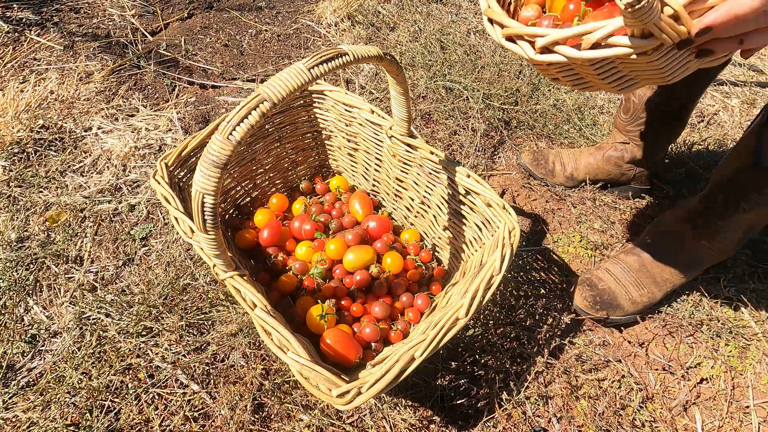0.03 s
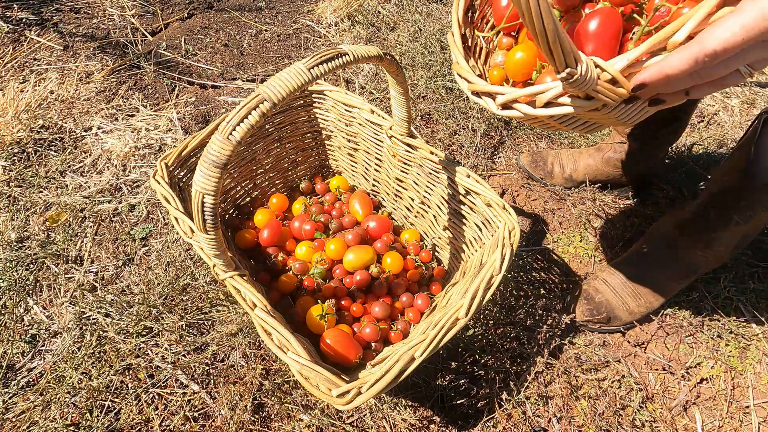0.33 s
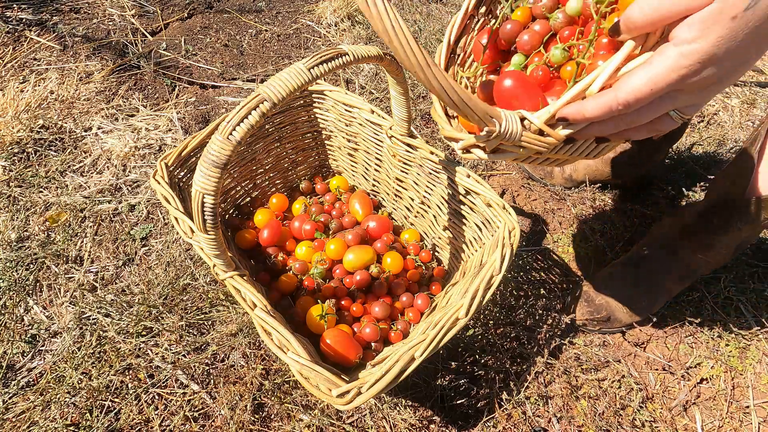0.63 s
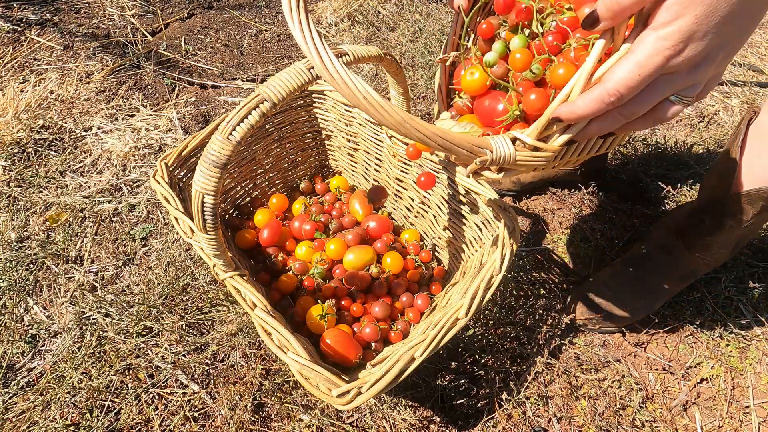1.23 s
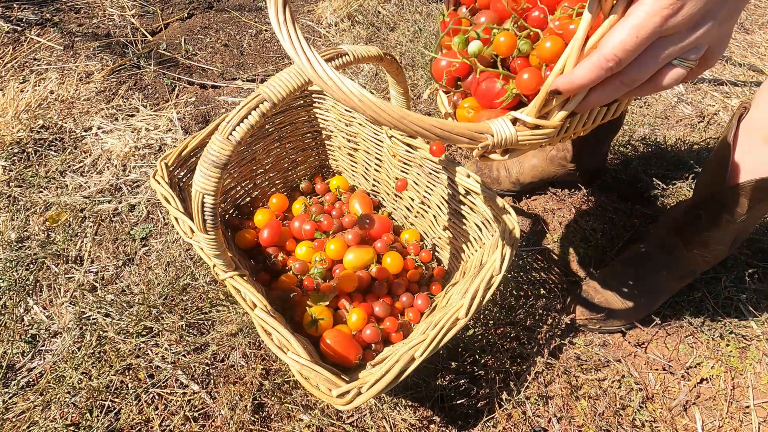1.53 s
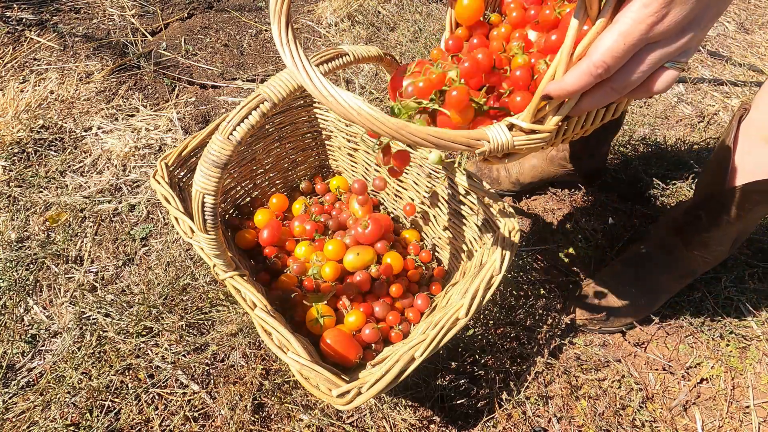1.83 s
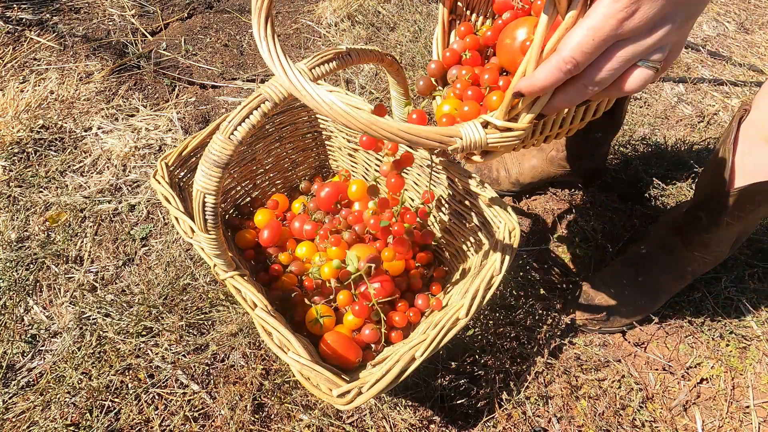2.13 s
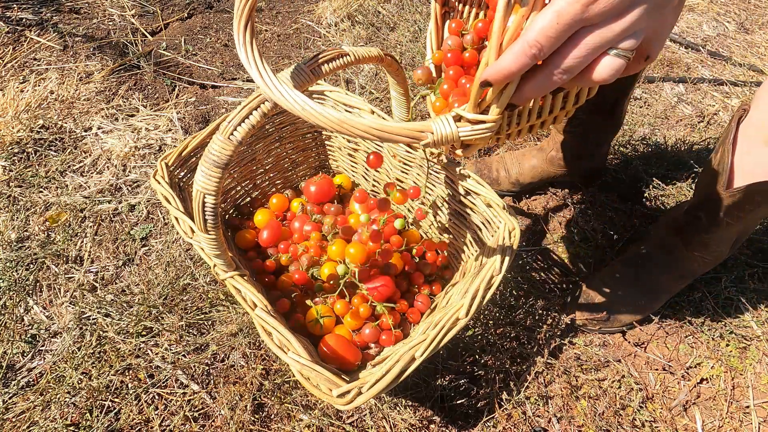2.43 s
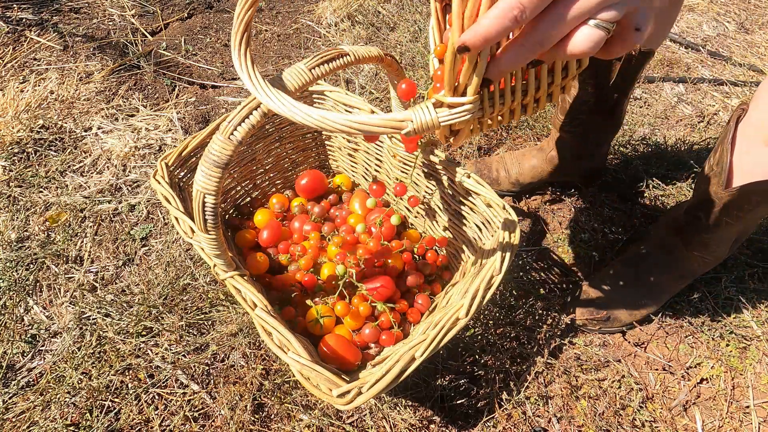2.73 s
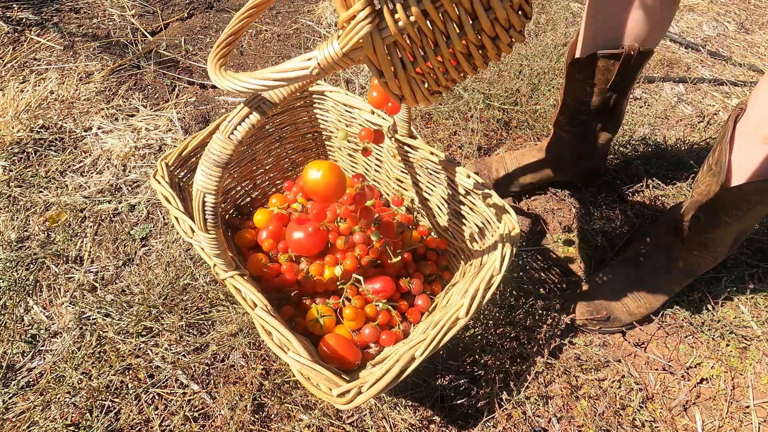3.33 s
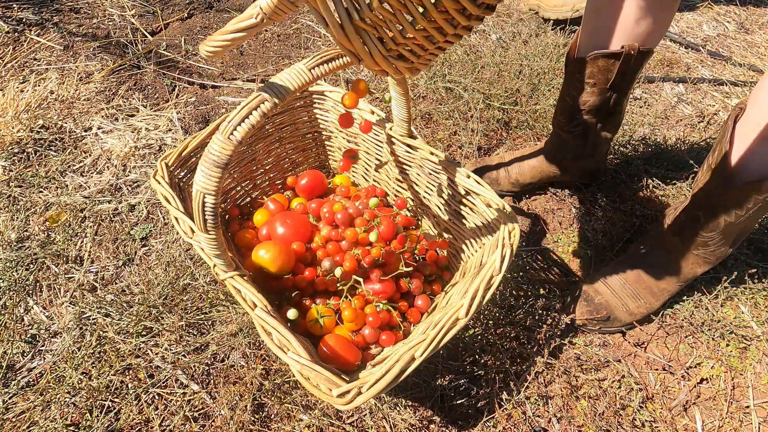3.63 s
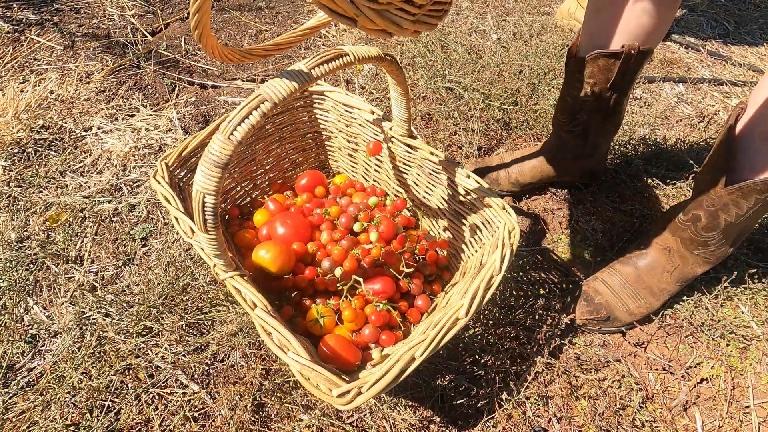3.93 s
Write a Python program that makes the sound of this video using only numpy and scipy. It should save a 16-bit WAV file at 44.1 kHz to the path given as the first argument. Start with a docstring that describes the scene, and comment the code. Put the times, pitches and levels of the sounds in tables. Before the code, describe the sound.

Small tomatoes tumble between baskets with soft patters, rustles and wicker creaks, after a moment of garden wind and distant chirps. A cane snaps midway, gusts bump the microphone, and a low metallic clang rings on late.

```python
"""Cherry tomatoes are tipped from one wicker basket into another in a garden.
From the start, wind rumbles and bumps the microphone, a far bird trills and the canes creak faintly.
After a second the pour begins: fruit rustles, patters and taps the weave, and stems and skins squeak.
Near two seconds another bird whistles, then a stout cane snaps and the whole basket rings.
Near the end a knock sets something metal, probably the microphone stand, ringing."""
import sys
import numpy as np
from scipy import signal
from scipy.fft import rfft, irfft, next_fast_len
from scipy.io import wavfile

SR = 44100
rng = np.random.default_rng(int(sys.argv[2]) if len(sys.argv) > 2 else 0)


def pcm_store(signal):
    """Save signal as 16-bit PCM."""
    levels = np.round(np.clip(np.atleast_2d(signal), -1, 1) * 32767)
    wavfile.write(sys.argv[1], SR, levels.astype(np.int16).T)


N = 176400   # 4 seconds

# how loud the wind is: t/s, level/dB
WIND_LOUDNESS = [(0, -47), (1.1, -45.5), (1.25, -41.5), (2, -40), (2.6, -35.5), (3.2, -38), (3.5, -41),
                 (4, -38)]
# tone of the wind: f/Hz, level/dB
WIND_TONE = [(22, 1), (40, 3.5), (70, 3), (110, -3), (160, -7.5), (240, -16.5), (400, -25)]
# tone of the far garden hush: f/Hz, level/dB
HUSH_TONE = [(250, -3), (600, -7), (1050, -2), (1500, -4), (2300, -16.5), (3500, -24.5), (5000, -29.5),
             (7500, -34.5), (9500, -47), (12800, -37.5), (15500, -44)]
# how loudly fruit and canes rub: t/s, level/dB
RUSTLE_LOUDNESS = [(0, -76), (.27, -70), (.47, -86.5), (.56, -76), (.88, -75.5), (1.02, -86), (1.09, -74),
                   (1.135, -75), (1.16, -55), (1.22, -60), (1.27, -64), (1.32, -72), (1.42, -65),
                   (1.47, -55), (1.53, -61), (1.6, -56), (1.83, -62), (1.93, -52.5), (2.07, -51.5),
                   (2.15, -47.5), (2.22, -54), (2.36, -53), (2.6, -55), (2.85, -58.5), (2.97, -51.5),
                   (3.06, -52), (3.12, -59.5), (3.25, -50.5), (3.5, -52), (3.7, -56.5), (4, -60)]
# tone of that rubbing: f/Hz, level/dB
RUSTLE_TONE = [(1200, -5), (2000, -1.5), (3300, 0), (5000, -4), (7600, -4.5), (9200, -12.5), (12200, -7.5),
               (13600, -19), (15500, -31)]
# bird trills: t/s, number of chirps, level/dB
BIRD_TRILLS = [(.003, 6, -57.5), (.517, 4, -62.5), (.679, 5, -59), (1.7, 4, -61), (1.868, 4, -54),
               (2.302, 5, -56), (2.72, 8, -59)]
# wind hits the microphone: t/s, level/dB, length/s, top f/Hz, left minus right/dB
WIND_BUMPS = [(0.064, -35, .065, 195, -3), (0.39, -35.5, .05, 220, 3), (0.482, -41.5, .07, 94, 0),
              (.6, -38, .04, 127, 3), (0.928, -42, .05, 120, -6), (1.145, -37.5, .06, 135, -2),
              (1.555, -42, .04, 148, 12), (1.66, -39, .035, 123, 8), (2.409, -33.5, .025, 172, -10),
              (2.477, -31, .07, 195, -7.5), (2.707, -29.5, .04, 119, -7), (2.785, -27, .085, 175, -4.5),
              (2.881, -31, .06, 207, -8), (3.069, -30.5, .042, 185, -5.5)]
# canes creak: t/s, level/dB, fade time/s, centre f/Hz
CANE_CREAKS = [(.129, -61.5, 0.0051, 4970), (.248, -65, .008, 5000), (.274, -66, .006, 6460),
               (.521, -63, .004, 7500), (.6345, -49, .005, 6900), (.898, -68, .005, 6000),
               (1.147, -49, 0.022, 4000), (1.1672, -47, 0.0099, 3340), (1.251, -60, 0.0041, 7500),
               (1.2785, -47.5, 0.0042, 3720), (1.4486, -44, 0.022, 8000), (1.464, -41.5, 0.013, 11000),
               (1.518, -47, 0.0028, 4800), (1.5529, -46, 0.016, 7760), (1.598, -49.5, .025, 11500),
               (1.6775, -37.5, 0.008, 10600), (1.7482, -31.5, 0.0032, 4800), (1.9245, -45.5, .018, 3770),
               (1.965, -49, 0.011, 3780), (1.9894, -36.5, 0.0037, 3520), (2.015, -46, .003, 3800),
               (2.0572, -48, .008, 4800), (2.1034, -23.8, 0.012, 3400), (2.117, -39.5, 0.021, 4900),
               (2.149, -41, .002, 3600), (2.1814, -36.5, 0.011, 5560), (2.2412, -38.5, 0.004, 5370),
               (2.253, -45, .008, 7000), (2.2722, -32.5, 0.005, 4300), (2.286, -40, .005, 5500),
               (2.3146, -44, .004, 3800), (2.3503, -36.5, 0.004, 4400), (2.356, -43, .012, 7500),
               (2.4284, -45, 0.0047, 7000), (2.5045, -44, 0.008, 6500), (2.521, -46, .003, 7000),
               (2.584, -48, .004, 5500), (2.6362, -37.5, 0.003, 3970), (2.7487, -48, .003, 5200),
               (2.942, -47, 0.004, 4500), (2.952, -45, .003, 8000), (2.981, -46, .003, 5500),
               (3.033, -49.5, 0.015, 5400), (3.0535, -43, 0.016, 5900), (3.16, -45, 0.013, 7000),
               (3.187, -46.5, 0.0074, 8000), (3.253, -46, .004, 6600), (3.2889, -43.5, 0.02, 7200),
               (3.3114, -35, 0.016, 5700), (3.398, -44.5, 0.014, 5500), (3.589, -44.5, 0.0077, 7950),
               (3.6132, -38.5, 0.0046, 6500), (3.8072, -49.5, 0.0079, 4800), (3.8731, -46, 0.0045, 5500),
               (3.8955, -46, 0.0038, 7500)]
# how loudly fruit lands on fruit: t/s, level/dB
PATTER_LOUDNESS = [(0, -97), (1.1, -71), (1.25, -54.5), (1.8, -56.5), (2.1, -50.5), (2.9, -52.5),
                   (3.2, -50), (3.6, -53), (4, -50)]
# tone of those landings: f/Hz, level/dB
PATTER_TONE = [(200, -10), (450, -2.5), (800, -3), (1600, -2.5), (3000, -13), (6000, -22)]
# single tomatoes hit the weave: t/s, level/dB, fade time/s, centre f/Hz
TOMATO_TAPS = [(1.1721, -39, 0.02, 407), (1.1986, -31.5, 0.0052, 1250), (2.857, -47, 0.025, 700),
               (2.891, -43, 0.008, 280), (2.917, -41, 0.011, 330), (3.083, -46, 0.011, 280),
               (3.4763, -40, 0.0042, 1400), (3.615, -42, 0.013, 1130), (3.9207, -45, 0.0056, 2200),
               (3.934, -46, 0.0068, 2000)]
# stems and skins squeak: t/s, level/dB, length/s, start f/Hz, end f/Hz
SKIN_SQUEAKS = [(1.312, -58, .03, 4500, 3850), (1.322, -64, .026, 6400, 6200),
                (1.83, -57, .026, 5350, 5100), (1.917, -55, .024, 4500, 3900)]
# notes of the basket frame: f/Hz, level/dB, time to fade by 60 dB/s
FRAME_NOTES = [(1200, -34, .06), (1560, -36, .05), (2191, -32, .065), (3397, -32, .05), (5039, -38, .06),
               (7494, -36, .045)]
# tone of the metal's many high notes, blurred together: f/Hz, level/dB
CLANG_TONE = [(90, -11), (150, 0), (400, -3.5), (800, -6.5), (1500, -10), (2500, -20.5), (7000, -23),
              (15000, -37)]
# low notes of the metal: f/Hz, level/dB, time to fade by 60 dB/s, left minus right/dB
METAL_NOTES = [(62.7, -43, 3.3, -3), (139, -32.5, 1.7, 2.5), (145, -20.5, 0.38, 1), (192, -39, 5.5, 1),
               (243, -36.5, 1.6, 4), (275, -40, 0.65, -13), (406, -34.5, 1.55, -2), (435, -42.5, 1.4, -5),
               (544, -43, 0.8, -7), (616, -35.5, 0.42, 9), (663, -46, 1.1, -4), (739, -41, 1.2, 3),
               (791, -43, 1.1, -1), (840, -38.5, .65, -8), (965, -41, .5, 0)]
# stereo width, as gain on what differs between left and right: t/s, level/dB
STEREO_WIDTH = [(0, -54), (1.12, -39), (1.16, -4.5), (2.2, -5), (2.6, 0.5), (4, -1.5)]


def from_db(db):
    """Turn decibels into a number to multiply by."""
    return 10 ** (np.asarray(db) / 20)


def rms_one(x):
    """Scale a sound so its average strength (rms) is 1."""
    return x / np.sqrt(np.mean(x ** 2) + 1e-20)


def level(rows):
    """A volume curve through (t/s, level/dB) points."""
    return from_db(np.interp(np.arange(N) / SR, *np.transpose(rows)))


def pan(db):
    """Left and right gains; positive db leans left."""
    return from_db(np.array([[db], [-db]]) / 2)


def add(out, at_s, sound):
    """Mix a sound in at a given time."""
    start = max(int(at_s * SR), 0)
    part = sound[..., :max(N - start, 0)]
    out[:, start:start + part.shape[-1]] += part


def band(x, low_hz, high_hz, order=2):
    """Keep what lies between two frequencies; a higher order cuts more sharply."""
    high_hz = min(high_hz, .45 * SR)
    sos = signal.butter(order, [min(low_hz, high_hz / 2), high_hz], "band", fs=SR, output="sos")
    return signal.sosfilt(sos, x + 1e-18)


def colour(x, tone):
    """Shape a sound with a tone table, falling steeply past its ends; the result has rms 1."""
    hz, db = np.transpose(tone)
    size = next_fast_len(N + SR // 2)
    octave = np.log2(np.maximum(np.fft.rfftfreq(2 * size, 1 / SR), 1))
    outside = np.abs(octave - np.clip(octave, np.log2(hz[0]), np.log2(hz[-1])))
    gain_db = np.interp(octave, np.log2(hz), db) - np.minimum(24 * outside, 70)
    # these two steps make a filter that rings only after a click, never before it
    cepstrum = irfft(np.log(from_db(gain_db)))
    response = np.exp(rfft(2 * cepstrum[:size], 2 * size))
    return rms_one(irfft(rfft(x, 2 * size) * response)[..., :N])


def noise(size, likeness):
    """Stereo hiss; likeness runs from 0 (unrelated ears) to 1 (the same in both)."""
    mid, side = rng.standard_normal((2, size))
    return np.sqrt((1 + likeness) / 2) * mid + np.sqrt((1 - likeness) / 2) * np.array([side, -side])


def wander(per_s):
    """A slow random curve with per_s new values each second."""
    points = rng.standard_normal(400)
    return np.interp(np.arange(N) / SR * per_s, np.arange(len(points)), points)


def clicks(per_s, spread_db, size):
    """Clicks at random times, of uneven strength."""
    strength = from_db(spread_db * np.minimum(rng.exponential(1, size), 4))
    return (rng.random(size) < per_s / SR) * strength * rng.choice([-1, 1], size)


def grains(per_s, spread_db, ring_s, likeness, spots=12):
    """Tiny hits shared among several spots, each with a short ring of its own."""
    out, t = np.zeros((2, N)), np.arange(SR // 40) / SR
    hits, spot = clicks(per_s, spread_db, N), rng.integers(0, spots, N)
    for k in range(spots):
        ring = noise(len(t), likeness) * np.exp(-t / ring_s)
        out += signal.oaconvolve([hits * (spot == k)], ring, axes=1)[:, :N]
    return out


def note(length_s, db, start_hz, end_hz, unsteady=.0087):
    """A sliding tone whose pitch wobbles by the fraction `unsteady`."""
    size = int(length_s * SR)
    wobble = rms_one(band(rng.standard_normal(SR // 2), 40, 300))[-size:]
    hz = np.linspace(start_hz, end_hz, size) * (1 + unsteady * wobble)
    return from_db(db) * np.hanning(size) * np.sin(2 * np.pi * np.cumsum(hz) / SR)


def wind():
    """Moving air rumbles low on the microphone."""
    return level(WIND_LOUDNESS) * colour(noise(N, likeness=.934), WIND_TONE)


def hush():
    """The steady, soft noise of the far garden."""
    return from_db(-57) * colour(noise(N, likeness=1), HUSH_TONE)


def rustle(surges_per_s=38, surge_db=4.4):
    """Fruit and canes rub in many tiny touches as the load slides in little surges."""
    rubbing = grains(per_s=2400, spread_db=3.5, ring_s=.0015, likeness=.83)
    surges = from_db(surge_db * wander(surges_per_s))
    return level(RUSTLE_LOUDNESS) * colour(rubbing * surges, RUSTLE_TONE)


def ticks(canes=22, low_hz=1900, high_hz=8000, fade_cycles=15, db_per_octave=-.5, below_rustle_db=5):
    """Single stems and canes tick, each ringing briefly at its own pitch and place."""
    out, t = np.zeros((2, N)), np.arange(SR // 40) / SR
    hits, cane = clicks(per_s=220, spread_db=2.6, size=N), rng.integers(0, canes, N)
    for k, hz in enumerate(np.geomspace(low_hz, high_hz, canes)):
        ring = rms_one(np.exp(-t * hz / fade_cycles) * np.sin(2 * np.pi * hz * t))
        burst = rng.standard_normal(len(t)) * np.exp(-t / .0008)
        crack = rms_one(band(burst, hz / 1.6, hz * 1.6, order=1))
        gain = from_db(db_per_octave * np.log2(hz / low_hz)) * pan(rng.normal(0, 4))
        out += gain * signal.oaconvolve(hits * (cane == k), ring + .5 * crack)[:N]
    return level(RUSTLE_LOUDNESS) * from_db(-below_rustle_db) * rms_one(band(out, low_hz / 2, high_hz))


def bird_trills(every_s=.041, length_s=.032, start_hz=3680, end_hz=3270, echo_s=.013, echo_db=-11):
    """A far bird sings runs of falling chirps, no two alike, each with a faint echo."""
    out = np.zeros((2, N))
    for start_s, count, db in BIRD_TRILLS:
        for k, (late, loud, sharp) in enumerate(rng.standard_normal((round(count), 3))):
            at_s = start_s + k * every_s + .002 * late
            pitch = 1 + .007 * sharp
            chirp = note(length_s, db + 1.6 * loud, start_hz * pitch, end_hz * pitch)
            add(out, at_s, chirp)
            add(out, at_s + echo_s, from_db(echo_db) * chirp)
    return out


def wind_bumps(low_hz=33.4, soften_above_hz=107):
    """Swirls of air hit the microphone with short, low bumps."""
    out = np.zeros((2, N))
    for at_s, db, length_s, top_hz, lean_db in WIND_BUMPS:
        size = int(length_s * SR)
        swirl = band(noise(SR // 2, likeness=.83), low_hz, top_hz, order=3)
        swirl = band(swirl, 24, soften_above_hz, order=1)
        bump = rms_one(swirl[:, -size:] * signal.windows.tukey(size, .6))
        add(out, at_s, from_db(db) * pan(lean_db) * bump)
    return out


def crackles(rows, width, likeness, lead_s=.0026, lead_db=-10, slip_s=.00095, top_hz=12700):
    """A cane starts to slip, snaps, then settles in small slips; width is band edge over centre."""
    out, lead = np.zeros((2, N)), SR // 50
    t = (np.arange(SR // 5) - lead) / SR   # zero at the snap
    for at_s, db, fade_s, hz in rows:
        slips = clicks(per_s=900, spread_db=3, size=len(t)) ** 2
        slips[lead] = 1.3 ** 2   # energy of the snap itself
        energy = signal.lfilter([1], [1, -np.exp(-2 / (slip_s * SR))], slips)   # each slip dies away
        rise = from_db(lead_db) * np.exp(-abs(t) / lead_s)
        fall = np.exp(-abs(t) / fade_s)
        burst = np.sqrt(energy) * np.where(t < 0, rise, fall) * noise(len(t), likeness)
        burst = band(burst, hz / width, hz * width, order=1)
        burst = band(burst, hz / 5, min(hz * 3, top_hz), order=3)
        add(out, at_s - lead / SR, from_db(db) * burst * np.sqrt(fade_s * SR / np.sum(burst ** 2)))
    return out


def creaks():
    """The woven canes give way in short, bright crackles."""
    return crackles(CANE_CREAKS, width=1.51, likeness=.8)


def patter():
    """Fruit lands on fruit in many soft, dull hits."""
    landings = grains(per_s=260, spread_db=.5, ring_s=.0056, likeness=.9)
    return level(PATTER_LOUDNESS) * colour(landings, PATTER_TONE)


def taps(thud_hz=185, thud_s=.0085, above_tap_db=.5):
    """A tomato hits the weave, and the basket wall swings under it with a short, low thud."""
    out, t = crackles(TOMATO_TAPS, width=2.05, likeness=.85), np.arange(SR // 5) / SR
    for at_s, db, _, _ in TOMATO_TAPS:
        hz = thud_hz * rng.uniform(.82, 1.16)
        thud = np.exp(-t / thud_s) * np.sin(2 * np.pi * hz * t)
        add(out, at_s, from_db(db + above_tap_db) * thud)
    return out


def squeaks():
    """Stems and skins stick and slip on the canes, making shaky, falling squeaks."""
    out = np.zeros((2, N))
    for at_s, db, length_s, start_hz, end_hz in SKIN_SQUEAKS:
        add(out, at_s, note(length_s, db, start_hz, end_hz, unsteady=.02))
    return out


def bird_whistle(at_s=1.94):
    """Another bird whistles one rising note."""
    out = np.zeros((2, N))
    add(out, at_s, note(length_s=.19, db=-51, start_hz=2720, end_hz=2920))
    return out


def frame_ring(at_s=2.1036):
    """The whole basket gives a short, woody ring when a stout cane snaps."""
    out, t = np.zeros((2, N)), np.arange(SR // 5) / SR
    for hz, db, ring_s in FRAME_NOTES:
        add(out, at_s, from_db(db - 60 * t / ring_s) * np.sin(2 * np.pi * hz * t))
    return out


def metal_knock(at_s=3.326, rise_s=.0033, clang_s=.2, tail_s=1.7, waver=.15, wavers_per_s=24):
    """One blow on metal: a short clang, then low notes that waver and ring on."""
    out, t = np.zeros((2, N)), np.arange(N) / SR
    fade = from_db(-31 - 60 * t / clang_s) + from_db(-36 - 60 * t / tail_s)
    sound = fade * colour(noise(N, likeness=.47), CLANG_TONE)
    for hz, db, ring_s, lean_db in METAL_NOTES:
        # the wave runs a little ahead in one ear and behind in the other
        ear_shift = min(hz / 450, .7) * rng.choice([-1, 1]) * np.array([[1], [-1]])
        swell = 1 + waver * wander(wavers_per_s)
        drift = np.pi * waver * wander(wavers_per_s)
        wave = np.sin(2 * np.pi * hz * t + ear_shift + drift)
        sound += pan(lean_db) * from_db(db - 60 * t / ring_s) * swell * wave
    add(out, at_s, sound * (1 - np.exp(-t / rise_s)))
    return out


def scene():
    """Everything together in the open air."""
    opening = wind() + hush() + rustle() + ticks() + bird_trills() + wind_bumps() + creaks()
    return opening + patter() + taps() + squeaks() + bird_whistle() + frame_ring() + metal_knock()


def record(dry, wide_above_hz=10000, extra_width=.72, cutoff_hz=15700):
    """The sound starts narrow and spreads out, widest in the high treble; the very top is cut off."""
    mid, side = (dry[0] + dry[1]) / 2, (dry[0] - dry[1]) / 2
    side = level(STEREO_WIDTH) * side + extra_width * band(side, wide_above_hz, cutoff_hz, order=1)
    top_cut = signal.ellip(10, .2, 80, cutoff_hz, fs=SR, output="sos")
    return signal.sosfilt(top_cut, [mid + side, mid - side])


dry = scene()
out = record(dry)
pcm_store(out)
```